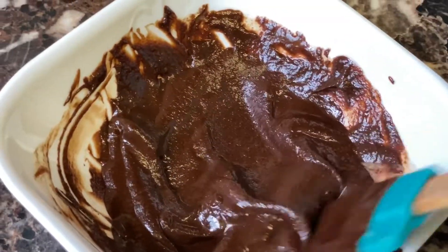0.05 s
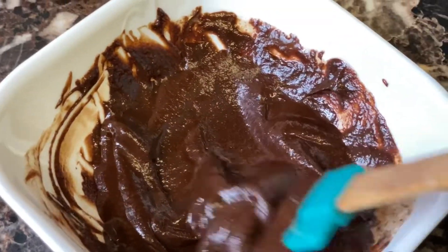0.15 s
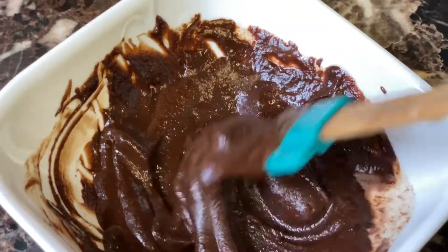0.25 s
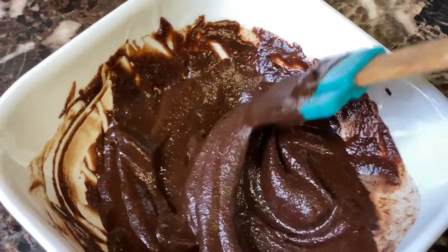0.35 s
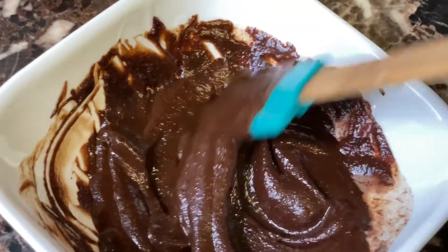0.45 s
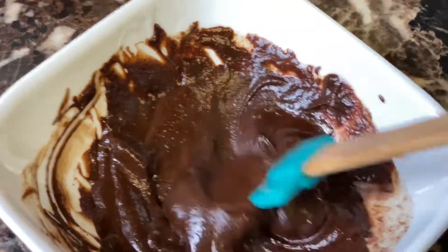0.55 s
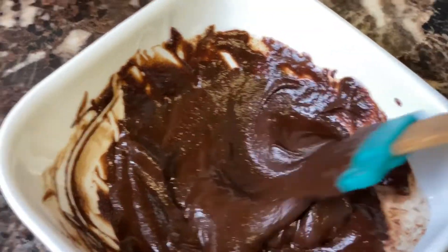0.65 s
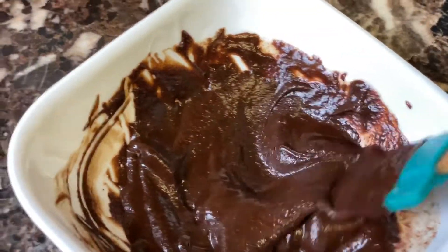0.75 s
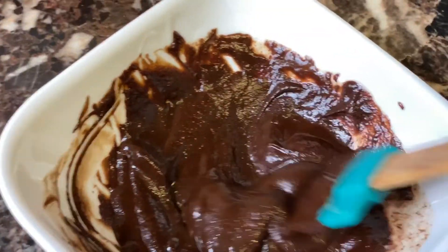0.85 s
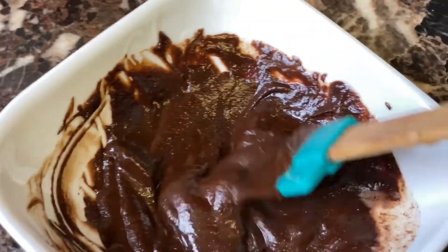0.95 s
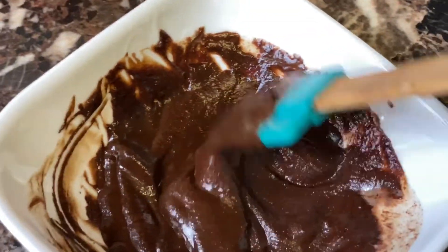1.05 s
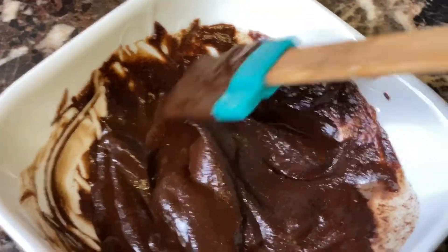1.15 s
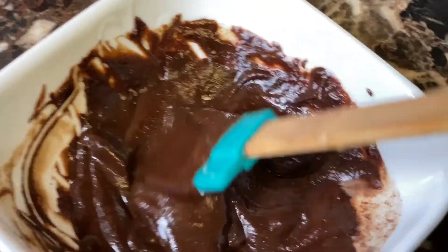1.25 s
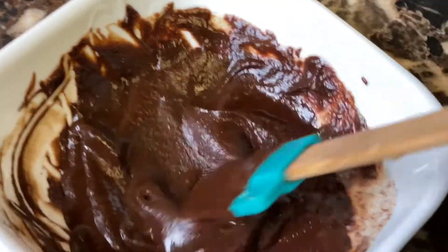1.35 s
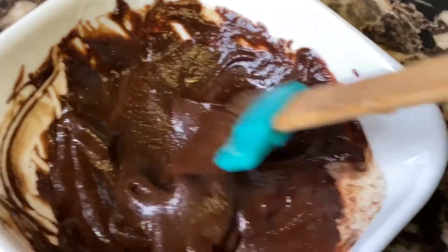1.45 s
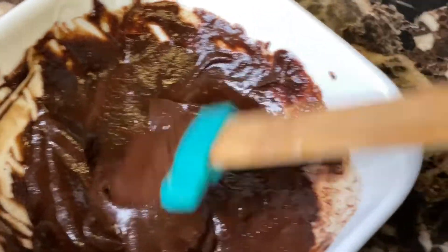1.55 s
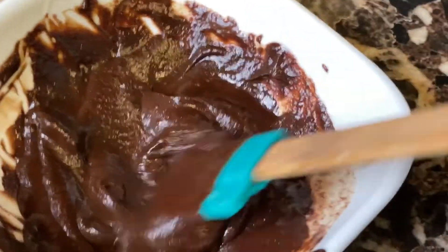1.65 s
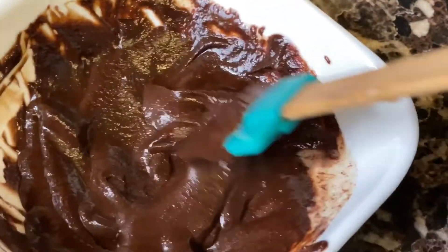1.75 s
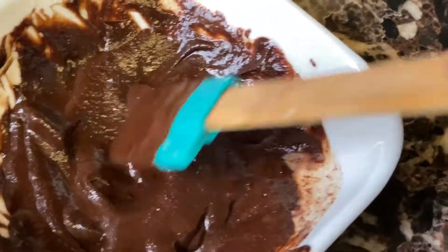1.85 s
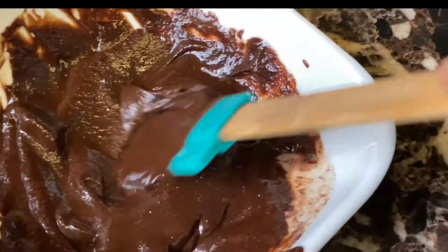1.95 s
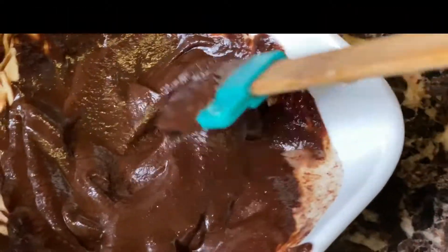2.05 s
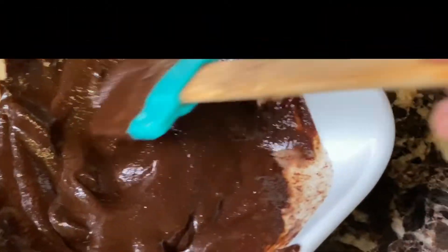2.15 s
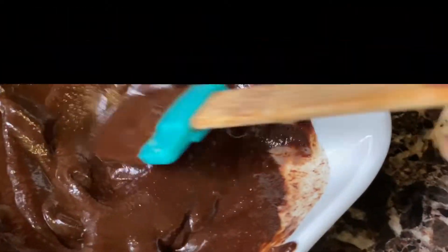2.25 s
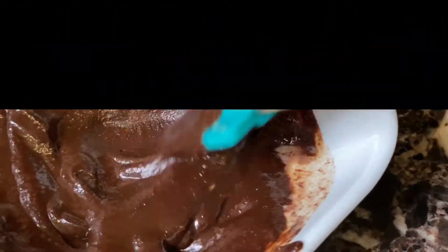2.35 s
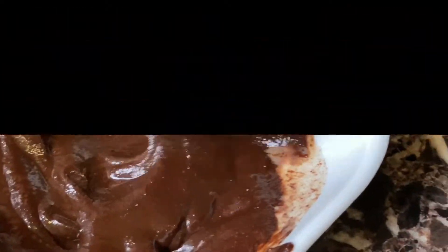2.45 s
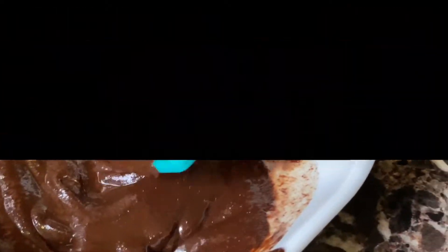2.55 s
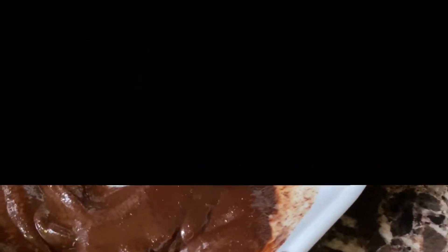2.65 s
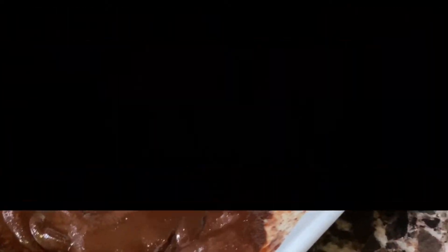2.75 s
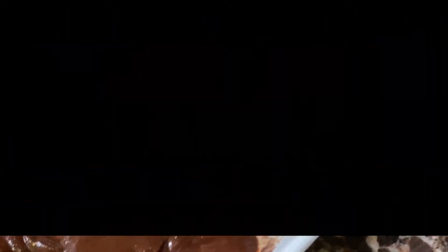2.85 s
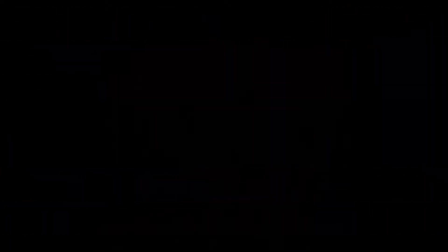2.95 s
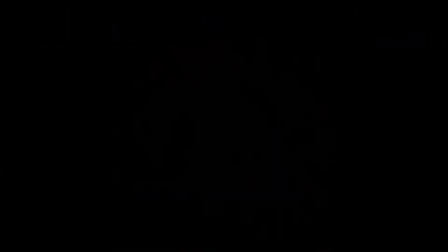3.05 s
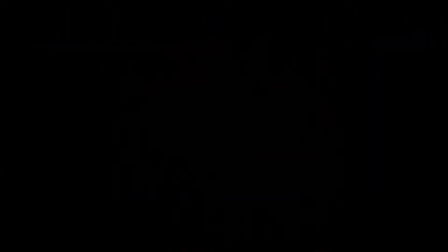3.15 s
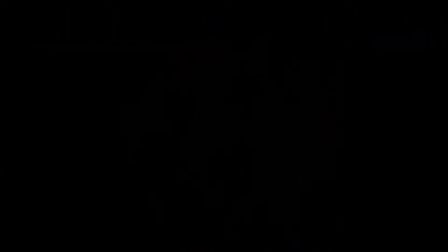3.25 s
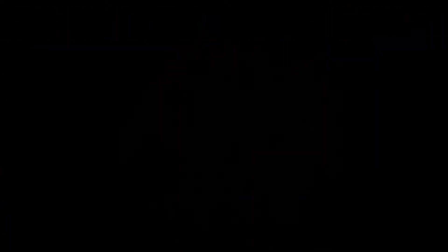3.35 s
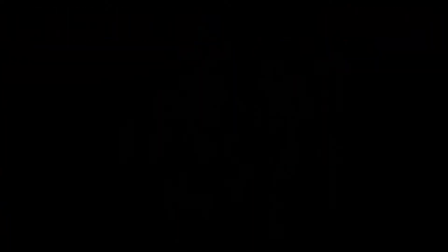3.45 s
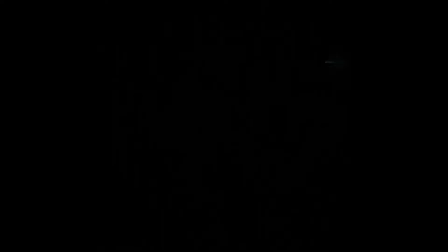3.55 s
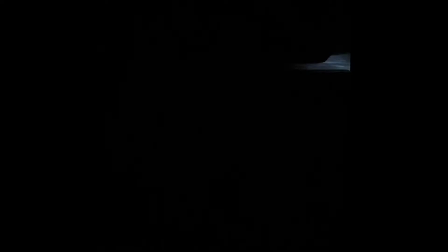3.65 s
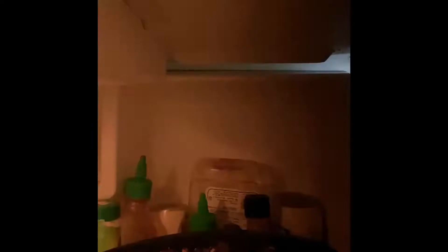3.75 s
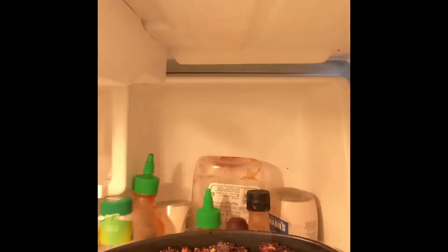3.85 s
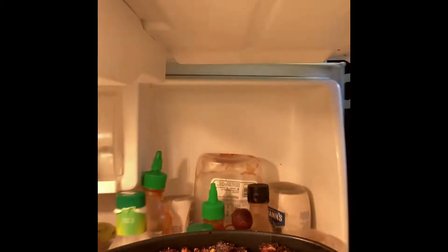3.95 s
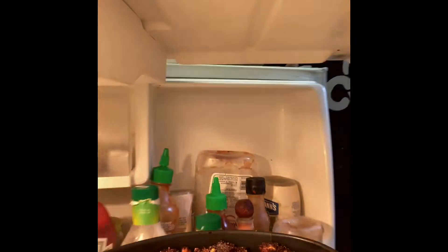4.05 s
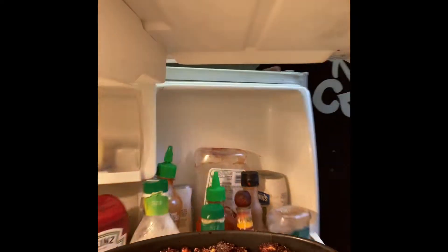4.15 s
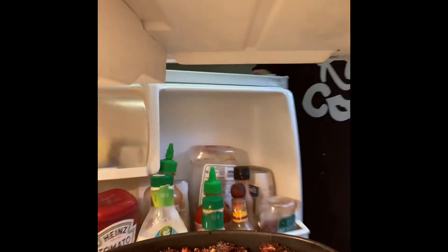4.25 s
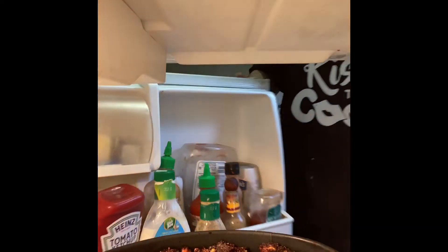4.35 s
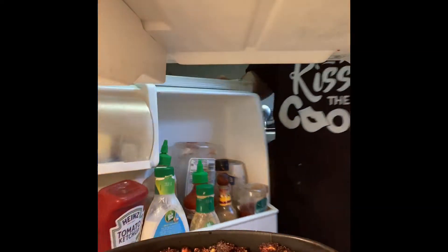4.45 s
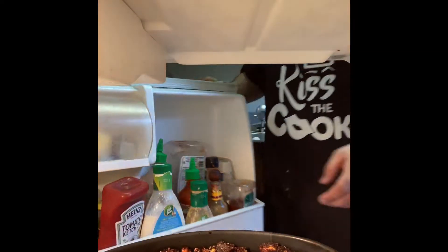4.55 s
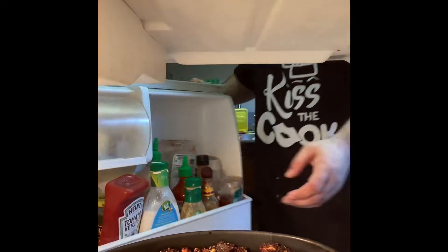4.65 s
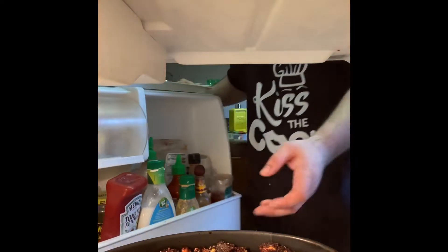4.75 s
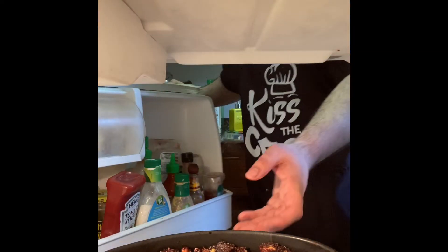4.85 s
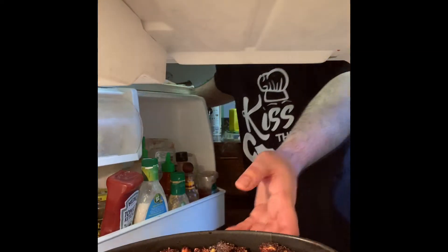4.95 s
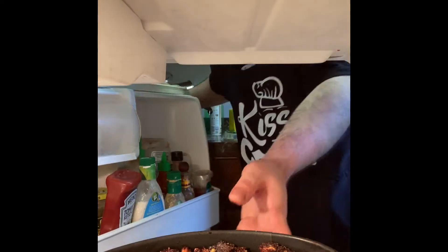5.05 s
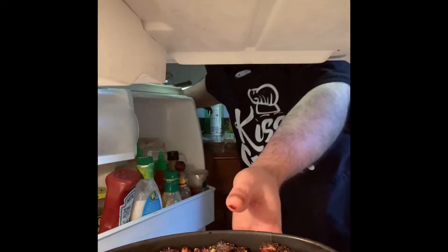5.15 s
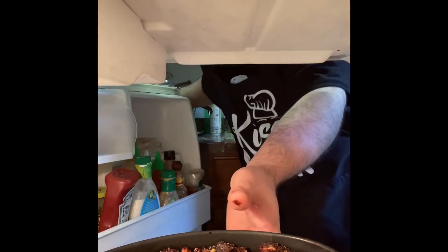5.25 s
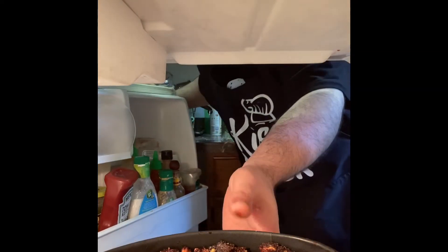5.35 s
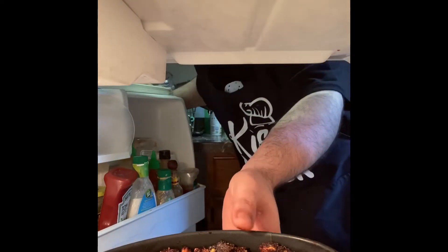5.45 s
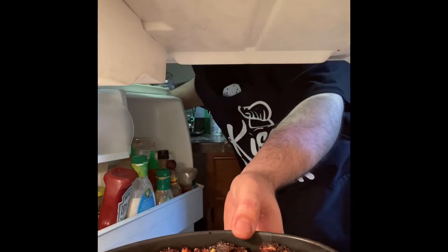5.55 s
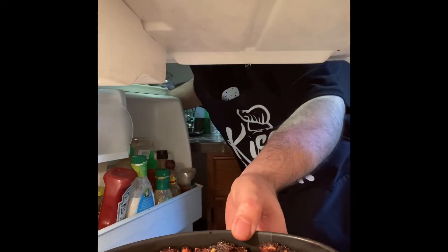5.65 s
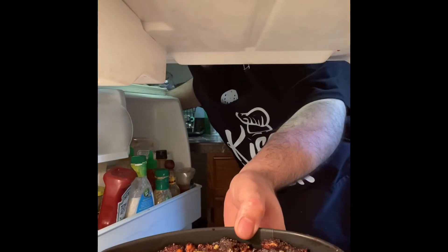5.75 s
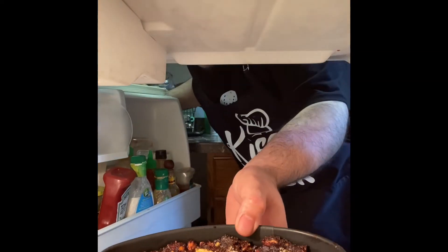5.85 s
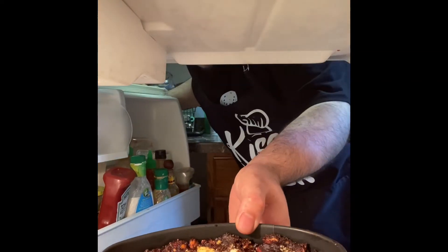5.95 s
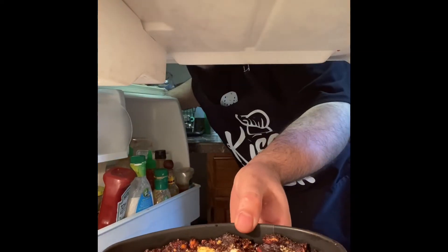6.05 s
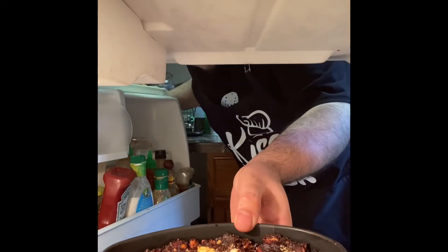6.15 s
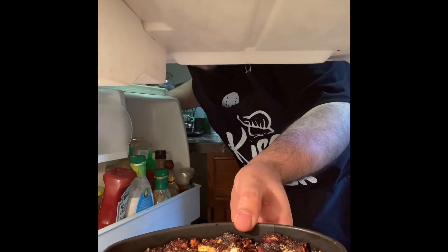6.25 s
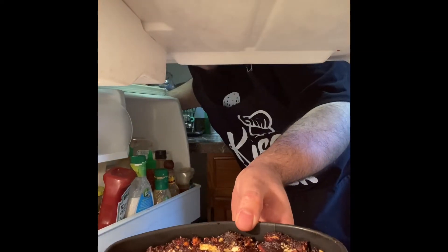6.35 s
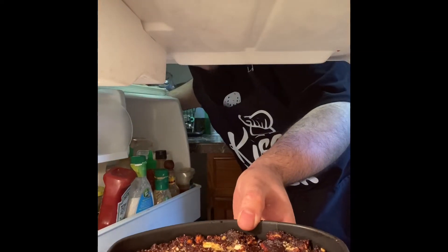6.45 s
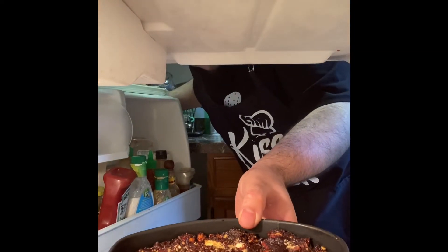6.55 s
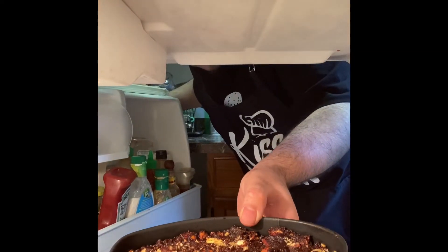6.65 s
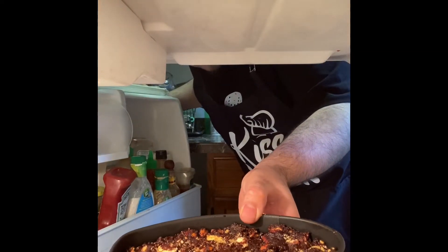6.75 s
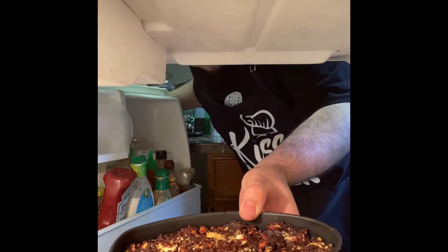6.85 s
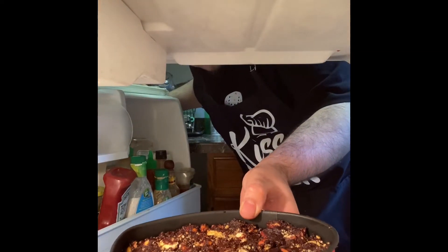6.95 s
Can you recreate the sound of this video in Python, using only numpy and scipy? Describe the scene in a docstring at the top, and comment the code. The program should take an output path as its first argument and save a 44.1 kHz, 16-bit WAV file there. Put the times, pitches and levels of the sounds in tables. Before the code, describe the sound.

In a quiet kitchen with faint appliance hum, a spatula drags through thick chocolate with soft smacks, small squelches and a dull bowl tap. This fades into a louder, boxy refrigerator hum heard from inside. The door seal crackles and squeaks loose, heavy low thuds shake the cabinet, and jars clink. The hum continues, brighter in buzz, with small ticks and light sleeve and pan rustles. Close stereo microphone.

```python
"""A spatula stirs thick chocolate in a quiet kitchen; the place then fades to inside a running refrigerator.
The door seal peels off with a squeak, the door thuds open, jars shift and a sleeve rustles in reaching for a pan.
Compressor and mains buzz are wavering sines, fan and air are filtered noise, and knocks ring decaying modes.
Paste, seal and sleeve are swells of noise; two microphones hear some sources slightly apart in time."""
import sys
import numpy as np
from scipy import signal
from scipy.fft import rfft, irfft, next_fast_len
from scipy.io import wavfile

SR = 44100
rng = np.random.default_rng(int(sys.argv[2]) if len(sys.argv) > 2 else 0)


def unload_audio(sound):
    """Save the sound as a 16-bit wav file, at the path given as the first command line argument."""
    columns = np.transpose(np.atleast_2d(sound))
    # keep every value between -1 and 1, then stretch to whole-number steps
    steps = np.round(np.clip(columns, -1, 1) * 32767)
    wavfile.write(sys.argv[1], SR, steps.astype(np.int16))


N = 309141
T = np.arange(N) / SR  # s
FADE_START_S, FADE_END_S = 1.9, 2.93  # the kitchen gives way to the refrigerator
SWING_START_S, SWING_END_S = 3.37, 4.75  # the door swings open
CUTOFF_HZ = 15900  # top of the recorded band
FAN_LAG = 12  # samples by which the left microphone hears fan and compressor late


def amp(db):
    """Amplitude factor of a level in dB."""
    return 10 ** (np.asarray(db) / 20)


def rms_one(x):
    """Scale a signal to rms 1."""
    return x / np.sqrt(np.mean(x ** 2) + 1e-20)


def at_hz(points, hz):
    """Read a level curve, straight in dB over log frequency."""
    points = np.array(points)
    return np.interp(np.log(hz), np.log(points[:, 0]), points[:, 1])


def ramp(start, end):
    """0 before start, 1 after end, both in seconds."""
    return np.clip((T - start) / (end - start), 0, 1)


def inside(shut_db, open_db):
    """Gain of a refrigerator sound: fades in, then moves to its open-door level."""
    level_db = shut_db + (open_db - shut_db) * ramp(SWING_START_S, SWING_END_S)
    return ramp(FADE_START_S, FADE_END_S) * amp(level_db)


def drift(rate_hz):
    """Slow chance of spread 1: noise through two equal low-pass poles, computed every 40 samples."""
    r = np.exp(-80 * np.pi * rate_hz / SR)
    noise = rng.standard_normal(N // 40 + 4002)
    slow = signal.lfilter([1], [1, -2 * r, r * r], noise)[4000:]
    return np.interp(np.arange(N) / 40, np.arange(len(slow)), rms_one(slow - slow.mean()))


def air(spectrum, side_db, peaks=()):
    """Stereo noise: a coloured middle of rms 1 and an unrelated side part."""
    size = next_fast_len(N)
    hz = np.maximum(np.fft.rfftfreq(size, 1 / SR), 1)
    peak_db = sum(top / (1 + (2 * (hz - f) / w) ** 2) for f, w, top in peaks)
    db = at_hz(spectrum, hz) + peak_db
    white = rfft(rng.standard_normal((2, size)))
    mid = irfft(white[0] * amp(db), size)[:N]
    side = irfft(white[1] * amp(db + at_hz(side_db, hz)), size)[:N]
    return np.array([mid + side, mid - side]) / np.std(mid)


def tone(hz, waver_db):
    """A sine of about rms 1 whose level wavers."""
    waver = amp(waver_db * np.tanh(drift(7.8)))
    return np.sqrt(2) * waver * np.sin(2 * np.pi * (hz * T + rng.random()))


def resonance(x, hz, width_hz):
    """Two-pole band-pass of gain near 1 at its centre."""
    r = np.exp(-np.pi * width_hz / SR)
    poles = [1, -2 * r * np.cos(2 * np.pi * hz / SR), r * r]
    return signal.lfilter([(1 - r * r) / 2, 0, (r * r - 1) / 2], poles, x)


def ring(clicks, hz, t60):
    """A unit click sets a decaying sine of starting height 1 ringing."""
    r, w = amp(-60 / (t60 * SR)), 2 * np.pi * hz / SR
    return signal.lfilter([0, np.sin(w)], [1, -2 * r * np.cos(w), r * r], clicks + 1e-18)


def add(out, s, sound):
    """Mix a sound in at s seconds, cut at the end of the scene."""
    at = round(s * SR)
    out[..., at:at + sound.shape[-1]] += sound[..., :N - at]


# kitchen room air: f/Hz, relative level/dB per Hz
KITCHEN_AIR = [(25, -29), (38, -5), (70, -1.5), (130, -12), (170, -10), (240, -10.5), (400, -15.5),
               (520, -21), (1000, -32), (2400, -38), (2800, -49.5), (6200, -60), (7000, -64), (15000, -75)]
# its width at the microphones: f/Hz, side minus mid level/dB
KITCHEN_SIDE = [(60, -20), (200, -0.5), (380, -8), (700, -1), (1900, -4.5), (2300, -21.5), (6000, -18.5),
                (8000, 2), (15000, 7.5)]
# appliance tones in the kitchen: f/Hz, level/dB
KITCHEN_TONES = [(77.5, -59.5), (135.5, -47), (214, -54.5), (300, -61), (412, -62), (428, -61), (472, -67),
                 (2530, -83)]


def kitchen():
    """Room air as coloured noise and appliances as wavering sines, fading out."""
    tones = sum(amp(db) * tone(hz, 2.0) for hz, db in KITCHEN_TONES)
    room = amp(-46.5) * air(KITCHEN_AIR, KITCHEN_SIDE)
    return (1 - ramp(FADE_START_S, FADE_END_S)) * (room + tones)


# fan air: f/Hz, relative level/dB per Hz
FAN_AIR = [(240, -8.5), (400, -3), (595, -12), (1150, -11.5), (1520, -20.5), (1930, -21), (2970, -20.5),
           (4680, -36), (5000, -55.5), (6000, -57), (8000, -56.5), (12000, -84)]
# air resonances of the cabinet: f/Hz, width/Hz, boost level/dB
CABINET = [(1140, 96, 4), (1934, 130, 7.5), (2167, 110, 7), (3260, 160, -7)]
# width of sound in the cabinet: f/Hz, side minus mid level/dB
FRIDGE_SIDE = [(60, -63), (140, -50.5), (210, -8), (330, -16.5), (500, -3.5), (770, 3), (1170, 1),
               (1790, -6), (2740, 0), (3600, -0.5), (4600, 0), (5100, 25), (6000, 17), (8000, -3)]


def fan_air(level_db):
    """Air noise spread through the cabinet, and a direct part from the fan, late at the left microphone."""
    spread = air(FAN_AIR, FRIDGE_SIDE, CABINET)
    direct = air(FAN_AIR, FRIDGE_SIDE, CABINET)[0]
    direct = signal.sosfilt(signal.butter(2, 800, "high", fs=SR, output="sos"), direct)
    return amp(level_db) * (spread + amp(-3.5) * np.array([np.roll(direct, FAN_LAG), direct]))


# compressor shaft orders: multiple of shaft rate, relative level/dB
SHAFT_ORDERS = [(1, 0), (2, -32.5), (6, -19.5), (7, -22), (29, -31), (33, -44.5)]
SHAFT_HZ = 58.8


def compressor():
    """Turning shaft as wavering sines at multiples of its rate."""
    fundamental, *orders = [amp(db) * tone(k * SHAFT_HZ, 1.0) for k, db in SHAFT_ORDERS]
    # the fundamental comes through the shelf, the higher orders through the air
    higher = sum(orders)
    return fundamental + np.array([np.roll(higher, FAN_LAG), higher])


# mains buzz: multiple of buzz rate, waver/dB, kitchen level/dB, door shut level/dB, door open level/dB
BUZZ = [(1, 4, -53, -39, -44.5), (2, -1.15, -45, -39, -29)]
BUZZ_HZ = 120
KITCHEN_PAN_DB, FRIDGE_PAN_DB = 1.5, -.8  # left minus right


def mains_buzz():
    """Wavering harmonics heard in both places, leaning to one side in each."""
    fade, buzz = ramp(FADE_START_S, FADE_END_S), 0
    for k, waver_db, kitchen_db, shut_db, open_db in BUZZ:
        gain = (1 - fade) * amp(kitchen_db) + inside(shut_db, open_db)
        buzz = buzz + gain * tone(k * BUZZ_HZ, waver_db)
    pan_db = KITCHEN_PAN_DB + (FRIDGE_PAN_DB - KITCHEN_PAN_DB) * fade
    return buzz * amp(pan_db * [[.5], [-.5]])


# fan blade tones: f/Hz, width of each of two filters/Hz, relative level/dB
FAN_BLADE = [(214.7, 13, -33.5), (435.8, 27, -50)]


def fan_blades():
    """An unsteady fan spreads each blade tone into a narrow band of noise."""
    out = 0
    for hz, width_hz, db in FAN_BLADE:
        narrow = resonance(rng.standard_normal(N), hz, width_hz)
        out = out + amp(db) * rms_one(resonance(narrow, hz, width_hz))
    return out


# tones heard while the door is shut: f/Hz, level/dB
CLOSED_TONES = [(42, -43), (135.5, -49)]
# rumble in the cabinet: f/Hz, relative level/dB per Hz
RUMBLE = [(25, 1.5), (40, -24.5), (52, -20), (90, 9.5), (110, -8.5), (130, 4.5), (155, 7), (185, -2),
          (205, -1), (260, -2), (300, -4), (370, -17), (450, -20.5), (520, -66)]
# gains (door shut dB, door open dB)
COMPRESSOR_DB, RUMBLE_DB, AIR_DB, BLADE_DB = (-34, -33.5), (-41, -37), (-50.5, -51), (-14.5, -5.5)


def fridge():
    """Compressor, buzz, fan, rumble and air from inside the cabinet, balanced by the door's position."""
    shaft = inside(*COMPRESSOR_DB) * compressor()
    shut_tones = inside(0, -33.5) * sum(amp(db) * tone(hz, 1.9) for hz, db in CLOSED_TONES)
    blades = inside(*BLADE_DB) * fan_blades()
    rumble = inside(*RUMBLE_DB) * air(RUMBLE, FRIDGE_SIDE)
    wind = inside(*AIR_DB) * fan_air(drift(8.5))
    return shaft + mains_buzz() + shut_tones + blades + rumble + wind


# spatula dragging through the paste: low edge f/Hz, high edge f/Hz, level/dB
DRAG = [(4430, 6430, -80), (2760, 3900, -81)]
DRAG_END_S = 2.3  # the stirring dies away before the room does


def drag():
    """Wet friction as bands of noise with a drifting level."""
    out = 0
    for low_hz, high_hz, db in DRAG:
        band = signal.butter(4, [low_hz, high_hz], "band", fs=SR, output="sos")
        noise = rms_one(signal.sosfilt(band, rng.standard_normal(N)))
        out = out + amp(db + 3.2 * drift(3.4)) * noise
    return (1 - ramp(FADE_START_S, DRAG_END_S)) * out


# wet squeaks of the blade on the bowl: t/s, length/s, first f/Hz, last f/Hz, level/dB, half width/Hz
SQUELCHES = [(0.373, 0.24, 4240, 4650, -75, 300), (0.41, 0.056, 5330, 5800, -75, 300),
             (0.898, 0.099, 6200, 5400, -76.5, 400), (0.95, 0.095, 4770, 3010, -70, 600),
             (0.955, 0.032, 4340, 4370, -68, 50), (1, 0.074, 3300, 3500, -74, 250),
             (1.068, 0.07, 5350, 5200, -69, 90), (1.091, 0.087, 4870, 2910, -72, 500),
             (1.112, 0.035, 3970, 3720, -69, 60), (1.103, 0.045, 4650, 4600, -74, 100),
             (1.122, 0.079, 5430, 5340, -77, 250), (1.098, 0.21, 4600, 4470, -74, 400),
             (1.507, 0.37, 5550, 5620, -75.5, 650), (2.033, 0.08, 5500, 5300, -81, 350),
             (2.082, 0.11, 4330, 4100, -74, 70), (2.19, .06, 4200, 4100, -78, 90)]


def squelches():
    """Bands of noise that slide in pitch as the wet blade drags."""
    out = np.zeros(N)
    for s, length, first_hz, last_hz, db, spread_hz in SQUELCHES:
        t = T[:round(length * SR)]
        turns = np.cumsum(first_hz + (last_hz - first_hz) * t / length) / SR
        low_pass = signal.butter(2, spread_hz, fs=SR, output="sos")
        rough = signal.sosfilt(low_pass, rng.standard_normal((2, SR // 2)))[:, -len(t):]
        band = rough[0] * np.sin(2 * np.pi * turns) + rough[1] * np.cos(2 * np.pi * turns)
        add(out, s, amp(db) * np.sin(np.pi * t / length) * rms_one(band))
    # the blade grips and lets go, which breaks the squeaks up
    return out * amp(2.5 * drift(90))


# paste smacking: t/s, level before the soft onset/dB, f/Hz
SMACKS = [(0.1011, -41.5, 5220), (0.2029, -64, 3230), (0.5103, -32.5, 6300), (1.1957, -36, 13400),
          (1.246, -35, 4560), (1.736, -48, 3640), (2.4365, -59, 3810)]
# taps on bowl and pan: t/s, level before the soft onset/dB, f/Hz, t60/s
BOWL_TAPS = [(0.0944, -50.5, 2180, .031), (0.617, -46, 1273, 0.04), (0.618, -46, 1410, 0.038),
             (0.625, -27.5, 260, .031), (5.707, -55, 4320, 0.049), (5.788, -48.5, 2230, 0.11)]
SMACK_T60_S = 0.0022
SMACK_OVERTONE, SMACK_OVERTONE_DB = 2.2, -23  # a smack also rings higher up: ratio and level


def spatula():
    """Smacks of the paste and taps on bowl and pan, each a short decaying sine."""
    out, t = np.zeros(N), T[:SR // 10]
    smacks = [(s, db, hz, SMACK_T60_S) for s, db, hz in SMACKS]
    higher = [(s, db + SMACK_OVERTONE_DB, hz * SMACK_OVERTONE, t60)
              for s, db, hz, t60 in smacks if hz * SMACK_OVERTONE < CUTOFF_HZ]
    onset = 1 - np.exp(-t / 0.000096)
    for s, db, hz, t60 in smacks + higher + BOWL_TAPS:
        add(out, s, amp(db - 60 * t / t60) * onset * np.sin(2 * np.pi * hz * t))
    return out


# paste, seal and sleeve rubbing, each a swell: peak t/s, level/dB, length/s
RUBS = [(0.206, -71.5, 0.046), (0.504, -75, 0.2), (0.643, -72, 0.17), (1.208, -75, .12), (1.707, -76, 0.61),
        (2.438, -73.5, 0.057), (3.018, -76, .1), (3.21, -73, 0.13), (3.348, -70, 0.19), (3.427, -58, 0.054),
        (3.49, -63, 0.052), (3.56, -60, 0.093), (3.62, -49.5, 0.1), (3.688, -43.5, 0.048),
        (3.776, -57.5, 0.22), (4.646, -62, 0.28), (4.755, -55.5, .14), (5.685, -69.5, 0.22),
        (5.843, -70, 0.39), (6.053, -63.5, 0.13), (6.182, -67, 0.063), (6.37, -74.5, 0.13),
        (6.499, -74, 0.3), (6.8, -71, 0.12), (6.95, -82.5, .12)]
# rustle: f/Hz, relative level/dB per Hz
RUSTLE_COLOUR = [(1500, -28.5), (2500, -3.5), (4500, -3), (5200, -31.5), (6200, -17.5), (7000, -9),
                 (10000, -8.5), (13000, -12), (14200, -13), (14800, -46)]
# width of rustle and ticks: f/Hz, side minus mid level/dB
RUB_SIDE = [(1000, -19), (5000, 7), (8000, -3.5), (15000, -12)]
RUB_RISE_SHARE, RUB_EDGE_DB = .45, -24.5  # share of a swell spent rising; level at its two ends
CLOTH_DB = (-83.5, -75.5)  # faint underlying rustle (door shut, door open)


def rubbing():
    """Rubbing surfaces as swells of flickering coloured noise."""
    swell = inside(*CLOTH_DB)
    for s, db, length in RUBS:
        away = np.maximum((s - T) / RUB_RISE_SHARE, (T - s) / (1 - RUB_RISE_SHARE)) / length
        swell = swell + amp(db + RUB_EDGE_DB * away)
    out = swell * amp(1.8 * drift(21)) * air(RUSTLE_COLOUR, RUB_SIDE)
    # the paste is straight ahead, the cabinet all around
    return np.where(T < FADE_START_S, out.mean(axis=0), out)


# seal letting go, shelves and jars ticking:
# t/s, bright part level/dB, dull part level/dB, left minus right level/dB, t60/s
TICKS = [(3.0081, -78.5, -58, 22, 0.071), (3.1944, -70, -79, 11, 0.038), (3.266, -65, -55, 1, 0.14),
         (3.292, -61.5, -54.5, -1, 0.24), (3.323, -68, -60, 7, 0.087), (3.381, -59, -62, 0, 0.031),
         (3.412, -60.5, -53.5, -2, 0.26), (3.438, -47.5, -45.5, 2.5, 0.052), (3.5245, -56, -51, 0, 0.06),
         (3.531, -52, -47.5, -0.5, 0.21), (3.5744, -81, -54, 2, 0.13), (3.618, -50, -41.5, -1, 0.26),
         (3.684, -61, -44, 6, 0.082), (3.754, -47.5, -39, 1.5, 0.1), (4.2086, -78, -57.5, 10, 0.043),
         (4.48, -72, -61, 1, 0.072), (4.616, -56.5, -67, 0, 0.069), (4.7567, -62, -49.5, 1, 0.062),
         (5.216, -88, -56.5, -6, 0.043), (5.707, -56.5, -55, -1, 0.059), (6.062, -66, -57, -1, .07),
         (6.18, -68.5, -55.5, 0, .06), (6.545, -77, -57, 11.5, 0.065), (6.605, -84, -57.5, 14.5, 0.034)]
# bright part of a tick: f/Hz, relative level/dB per Hz
TICK_BRIGHT = [(2500, -37.5), (3500, 4), (4600, 9.5), (5300, -9), (6200, 2.5), (7000, 0.5), (10000, 4),
               (13500, -0.5), (14300, -15), (14900, -43.5)]
# dull part of a tick: f/Hz, relative level/dB per Hz
TICK_DULL = [(600, 11.5), (1200, 3.5), (2500, 7.5), (4000, 4), (5500, -99)]
TICK_RISE_S = 0.0014


def ticks():
    """Small releases and contacts as dying puffs of crackling noise in two bands."""
    out = np.zeros((2, N))
    crackle = amp(4 * drift(600))
    bright = air(TICK_BRIGHT, RUB_SIDE) * crackle
    dull = air(TICK_DULL, RUB_SIDE) * crackle
    t = T[:SR // 4]
    for s, bright_db, dull_db, pan_db, t60 in TICKS:
        at = round(s * SR)
        span = slice(at, at + len(t))
        puff = amp(bright_db) * bright[:, span] + amp(dull_db) * dull[:, span]
        shape = amp(-60 * t / t60) * (1 - np.exp(-t / TICK_RISE_S))
        add(out, s, puff * shape / shape.max() * amp([[pan_db / 2], [-pan_db / 2]]))
    return out


# jars knocking in the door shelf:
# t/s, strike level/dB, f struck hardest/Hz, loss away from there/dB per octave
CLINKS = [(3.268, -51, 4030, 8), (3.296, -52, 3600, 8), (3.306, -48, 4000, 8), (3.4382, -44, 2900, 6),
          (3.533, -50, 2400, 14), (3.541, -46, 2600, 14), (3.560, -47, 2200, 14), (3.633, -44, 2950, 25),
          (3.6852, -38, 2380, 26), (3.691, -39.5, 2420, 22), (3.7542, -35, 3600, 10), (3.759, -45, 2400, 8),
          (4.4806, -42.5, 2110, 19), (5.707, -50.5, 2000, 10)]
# jar modes: f/Hz, relative level/dB, t60/s
JARS = [(820, -4, .03), (1440, 0, 0.036), (1956, 0, 0.03), (2190, -2.5, 0.036), (2380, 1, 0.037),
        (2710, -4.5, 0.03), (2920, 1, 0.06), (3250, -3, 0.03), (3380, 0, .025), (3670, 1, 0.032),
        (3980, -4, .03), (4350, 2, 0.028), (6050, -8, .025)]
CONTACTS, CONTACT_GAP_S, CONTACT_LOSS_DB = 3, .0016, 4  # a knock is a few quick, weakening contacts


def jars():
    """Each contact rings the jar modes, hardest near the knock's own pitch and a little unevenly."""
    s, db, struck_hz, fall_db = np.transpose(CLINKS)[..., None]
    order = np.arange(CONTACTS)
    gaps = CONTACT_GAP_S * order * rng.uniform(.7, 1.3, (len(s), CONTACTS))
    at = ((s + gaps) * SR).astype(int)
    uneven_db = 2.5 * rng.standard_normal((len(s), CONTACTS, len(JARS)))
    out = np.zeros(N)
    for k, (hz, top, t60) in enumerate(JARS):
        loss_db = CONTACT_LOSS_DB * order + fall_db * np.abs(np.log2(hz / struck_hz))
        clicks = np.zeros(N)
        clicks[at] = amp(db + top - loss_db + uneven_db[..., k]) * (-1) ** k
        out += ring(clicks, hz, t60)
    # the left microphone hears it four samples late
    return np.array([np.roll(out, 4), out])


# partials of the seal lip as it peels: t/s, length/s, first f/Hz, last f/Hz, level/dB
SQUEAK = [(3.602, 0.021, 1200, 1130, -41.5), (3.614, 0.038, 1115, 1075, -37),
          (3.640, 0.021, 1070, 990, -47), (3.600, 0.018, 1500, 1490, -42),
          (3.610, 0.037, 1620, 1510, -39.5), (3.600, 0.064, 2105, 2110, -38),
          (3.617, .024, 3100, 2400, -44), (3.636, 0.028, 1350, 1305, -37.5),
          (3.638, 0.028, 1800, 1870, -46.5), (3.658, 0.031, 1205, 1200, -41), (3.618, 0.016, 835, 810, -46),
          (3.650, .036, 850, 876, -46)]
SQUEAK_WOBBLE, SQUEAK_GRIT_DB = .012, 3.0  # spread of the pitch ratio and of the roughness


def squeak():
    """Overlapping partials swell and die, wobbling in pitch and roughened together by the slipping lip."""
    out, wobble = np.zeros(N), 1 + SQUEAK_WOBBLE * drift(150)
    for s, length, first_hz, last_hz, db in SQUEAK:
        t = T[:round(length * SR)]
        glide_hz = first_hz + (last_hz - first_hz) * t / length
        turns = np.cumsum(glide_hz * wobble[round(s * SR):][:len(t)]) / SR
        swell = np.sin(np.pi * t / length) ** 0.99
        add(out, s, amp(db) * np.sqrt(2) * swell * np.sin(2 * np.pi * (turns + rng.random())))
    out = out * amp(SQUEAK_GRIT_DB * drift(430))
    # it reaches the two microphones a little apart
    return np.array([np.roll(out, 4), out])


# the swinging door shakes the cabinet in bouts: start t/s, end t/s, first f/Hz, last f/Hz, level/dB
SHUDDERS = [(3.715, 3.82, 42.2, 54, -23), (3.832, 3.935, 60.2, 51, -23.5)]
SHUDDER_EDGE_S = 0.0075
SHUDDER_OCTAVE_DB = -12.5  # the shake is lopsided, which adds its octave


def shudder():
    """Lopsided low shaking of uneven strength and sliding speed."""
    out = 0
    for start, end, first_hz, last_hz, db in SHUDDERS:
        held = ramp(start - SHUDDER_EDGE_S, start) - ramp(end, end + SHUDDER_EDGE_S)
        mean_hz = first_hz + (last_hz - first_hz) * ramp(start, end) / 2  # averaged since the start
        turn = 2 * np.pi * (T - start) * mean_hz
        out = out + amp(db) * held * (np.cos(turn) + amp(SHUDDER_OCTAVE_DB) * np.cos(2 * turn))
    return np.sqrt(2) * amp(1.3 * drift(25)) * out


# blows on the cabinet: t/s, level/dB, contact softness f/Hz
THUDS = [(3.294, -32, 402), (3.309, -25.5, 404), (3.628, -15, 151), (3.637, -11.5, 150),
         (3.654, -18.5, 140), (3.669, -14, 138), (3.702, -10.5, 152), (3.765, -16.5, 563),
         (3.771, -22, 500), (4.481, -27.5, 900)]
# cabinet modes: f/Hz, relative level/dB, t60/s
BODY = [(46.6, -10, 0.2), (79.3, 1, 0.1), (123.6, 0, 0.08), (286, -10.5, 0.12), (362, -4.5, 0.097),
        (646, -1, 0.0095), (780, -16, 0.15)]
# loose shelves and liner: f/Hz, relative level/dB per Hz
THUMP_COLOUR = [(60, -18), (120, 14), (350, -3.5), (600, -19), (1000, -11.5), (1500, -49)]


def door():
    """Soft blows ring the cabinet modes and rattle loose parts; the swing shakes it."""
    blows, rattle = np.zeros((2, N))
    t = T[:SR // 20]
    for s, blow_db, soft_hz in THUDS:
        push = t * np.exp(-2 * np.pi * soft_hz * t)
        add(blows, s, -amp(blow_db) * push / push.sum())
        add(rattle, s, amp(blow_db - 10.0 - 60 * t / 0.11) * (1 - np.exp(-t / 0.0046)))
    body = sum(amp(top) * ring(blows, hz, t60) for hz, top, t60 in BODY)
    return body + rattle * air(THUMP_COLOUR, FRIDGE_SIDE) + shudder()


def scene():
    """Both places, with the stirring first and the door opening later."""
    places = kitchen() + fridge()
    stirring = drag() + squelches() + spatula()
    return places + stirring + rubbing() + ticks() + jars() + squeak() + door()


def record(dry):
    """The microphone loses the deepest bass, the top is cut."""
    dry = signal.sosfilt(signal.butter(4, 36, "high", fs=SR, output="sos"), dry)
    return signal.sosfilt(signal.cheby2(12, 70, CUTOFF_HZ, fs=SR, output="sos"), dry)


dry = scene()
out = record(dry)
unload_audio(out)
```